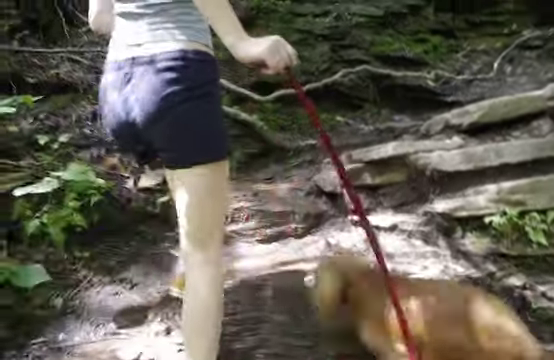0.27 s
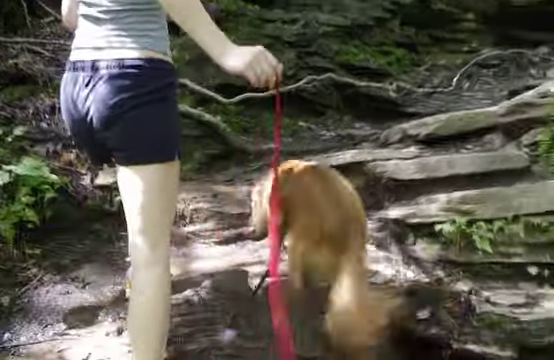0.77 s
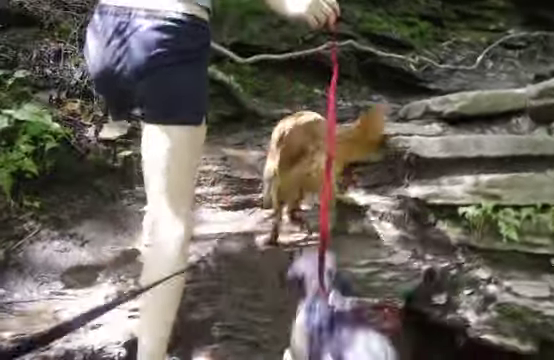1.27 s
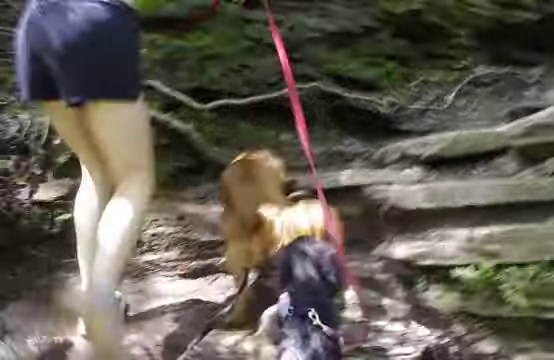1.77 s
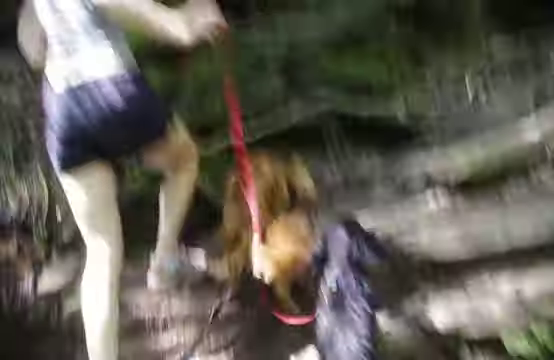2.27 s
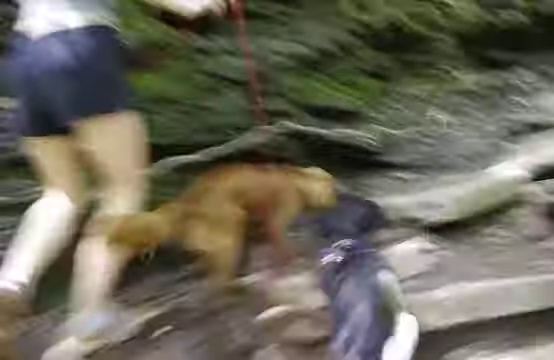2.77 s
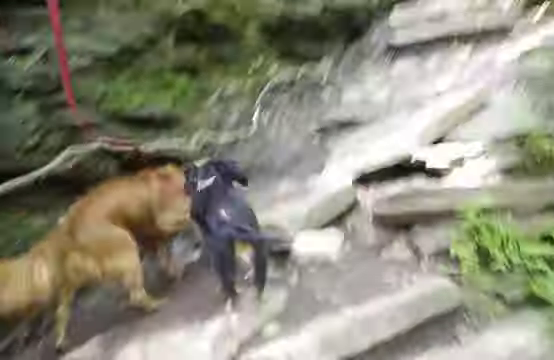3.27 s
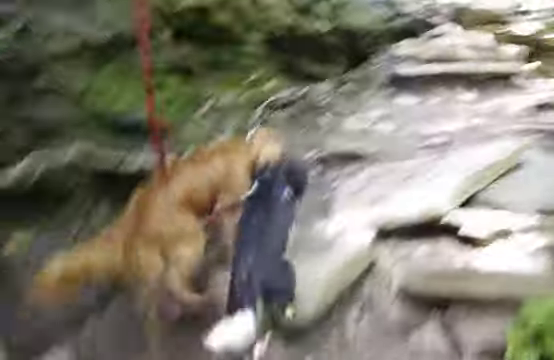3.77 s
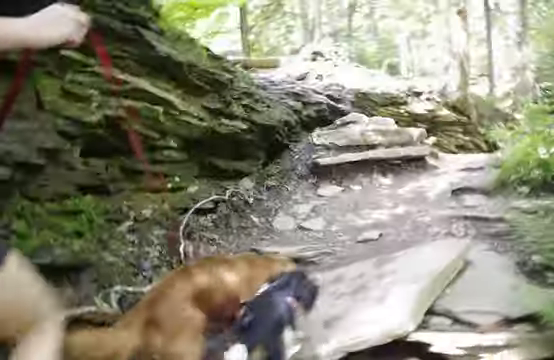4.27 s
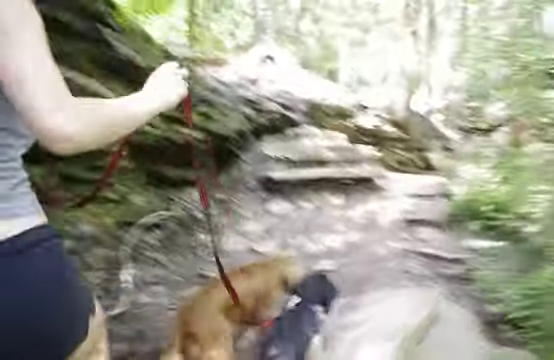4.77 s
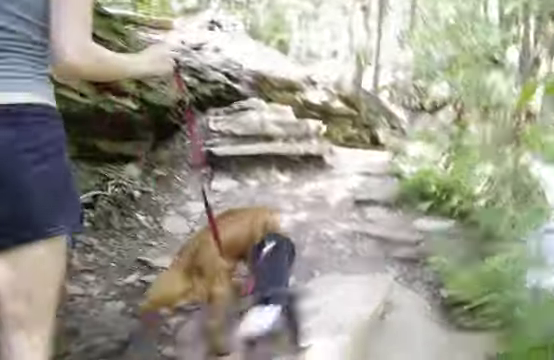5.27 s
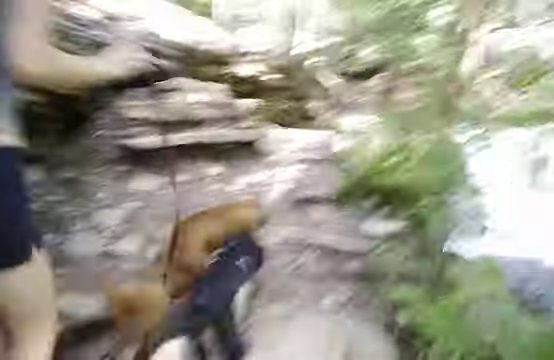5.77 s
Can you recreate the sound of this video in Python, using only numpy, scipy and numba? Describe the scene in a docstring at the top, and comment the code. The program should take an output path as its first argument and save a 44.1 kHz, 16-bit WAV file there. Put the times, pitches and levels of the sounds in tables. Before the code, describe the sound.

Water splashes down rocky ledges in an even hiss that turns a little thinner as the microphone moves along.

```python
"""A small waterfall beside a rocky path, heard by a hand-held mono phone that walks and turns.
From the start, countless drops and bubbles merge into a hiss, and a rock wall close by adds low roar.
At about 3 s the phone turns from the wall; the roar drops and keeps fading as the phone walks on.
All along, narrow bands of pitch swell among the rocks and the hiss spits now and then.
The phone's fast limiter turns the hiss down for a moment after each peak."""
import sys
import numpy as np
from scipy import signal
from scipy.fft import rfft, irfft, next_fast_len
from scipy.io import wavfile
from scipy.ndimage import uniform_filter1d
from numba import njit

SR = 44100
rng = np.random.default_rng(int(sys.argv[2]) if len(sys.argv) > 2 else 0)


def output_pcm(signal):
    """Save a mono or channel-first signal as 16-bit PCM at the path in sys.argv[1].

    Samples are clipped to [-1, 1] before scaling.
    """
    pcm = np.clip(np.atleast_2d(signal).T, -1, 1) * 32767
    wavfile.write(sys.argv[1], SR, np.round(pcm).astype(np.int16))


N = 266018

TURN_MIDDLE_S, TURN_LENGTH_S = 2.95, .5
ROAR_HZ, ROAR_OCTAVES, ROAR_FADE_DB_PER_S = 650, 0.47, 1.5
SWELL_WIDTH_HZ = 170.0
SMALL_SPITS_PER_S, SMALL_SPIT_DB, SPIT_S = 3, 5, 0.00076


def waterfall():
    """Drops of every size merge into a flickering hiss, which loses roar as the phone turns away."""
    # the tone of the water and microphone together: (frequency [Hz], level [dB])
    colour = [(25, -25), (120, -13), (270, -5.5), (600, -3.5), (1000, -7), (1420, -8), (2200, -7.5),
              (3340, -7.5), (4400, -5), (5850, -4), (7500, -0.5), (8900, 2.5), (10000, -3), (12500, -14),
              (15000, -21.5)]
    # what the rock wall adds while the phone faces it: (frequency [Hz], boost [dB])
    wall = [(100, 2), (250, 3.5), (620, 4), (1200, 2.5), (2200, 3.5), (4000, 2), (6500, 0.8), (11500, -0.4)]
    colour_hz, colour_db = np.transpose(colour)
    wall_hz, wall_db = np.transpose(wall)
    size = next_fast_len(N)
    impacts = rng.standard_normal(size) * undb(1.2 * rng.exponential(size=size))
    octave = np.log2(np.maximum(np.arange(size // 2 + 1) * SR / size, 1))
    spectrum = rfft(impacts) * undb(np.interp(octave, np.log2(colour_hz), colour_db))
    since_turn_s = np.arange(N) / SR - TURN_MIDDLE_S
    facing = np.cos(np.pi / 2 * np.clip(since_turn_s / TURN_LENGTH_S + .5, 0, 1)) ** 2  # from 1 to 0
    fade_db = -ROAR_FADE_DB_PER_S * np.maximum(since_turn_s, 0)
    surge_db = 0.47 * wander(11) + 0.46 * wander(4.13)  # the flow surges in all bands at once
    hiss = 0
    for centre in np.arange(4.5, 14.6, .5):  # bands half an octave apart, low to high
        share = np.cos(np.pi * np.clip(octave - centre, -.5, .5)) ** 2
        band = irfft(spectrum * share, size)[:N]
        turn_db = np.interp(centre, np.log2(wall_hz), wall_db) * (facing - .5)
        roar_db = np.exp(-((centre - np.log2(ROAR_HZ)) / ROAR_OCTAVES) ** 2) * fade_db
        flicker_db = 0.44 * wander(9)
        hiss = hiss + band * undb(turn_db + roar_db + surge_db + flicker_db)
    return hiss * undb(-20) / hiss.std()


def spit_gain():
    """A volume curve that makes the hiss spit: each spit is a jump about a millisecond long."""
    # the strongest spits: (time [s], boost [dB])
    strong_spits = [(1.234, 6.5), (1.355, 8.5), (1.872, 10), (3.184, 12), (3.349, 8), (3.43, 9.5),
                    (3.548, 7.5), (4.027, 9), (5.056, 11), (5.397, 7)]
    jumps_db = SMALL_SPIT_DB * (rng.random(N) < SMALL_SPITS_PER_S / SR)  # small ones fall by chance
    for time_s, boost_db in strong_spits:
        jumps_db[int(time_s * SR)] = boost_db
    bump = np.exp(-(np.arange(-64, 65) / SR / SPIT_S) ** 2)
    return undb(np.convolve(jumps_db, bump, "same"))


def rocks(hiss):
    """As the phone moves among the rocks, narrow bands swell and faint echoes drift."""
    # bands that grow louder for a while: (middle time [s], length [s], frequency [Hz], boost [dB])
    swells = [(.42, .7, 4430, 4), (.45, 0.51, 2480, 5), (.8, 2.2, 690, 3.5), (.9, .5, 3970, 3),
              (1.3, 2.7, 257, 2.5), (1.6, 1.1, 3550, 3), (2.05, .6, 4430, 3), (2.252, 1.7, 2190, 2.5),
              (2.65, 0.83, 840, 3.5), (3.6, .8, 1200, 2.5), (4.1, 1, 1370, 3.5), (5.098, 1.4, 1120, 4.5),
              (5.55, .6, 2980, 1.5), (5.6, .9, 1270, 3)]
    t = np.arange(N) / SR
    for middle_s, length_s, hz, boost_db in swells:
        swell = np.sin(np.pi * np.clip((t - middle_s) / length_s + .5, 0, 1)) ** 2
        band = band_pass(hiss, float(hz), SWELL_WIDTH_HZ)
        hiss = hiss + (undb(boost_db) - 1) * swell * band
    delays = [SR * delay_s * (1 + 0.057 * wander(1.5)) for delay_s in (.0021, .0034)]
    return hiss + undb(-29) * sum(echo(hiss, delay) for delay in delays)


@njit
def echo(x, delay):
    """The sound comes back off a ledge or the ground, after a drifting delay counted in samples."""
    y = np.zeros(len(x))
    for i in range(len(x)):
        k = int(i - delay[i])
        if k >= 0:
            y[i] = x[k] + (i - delay[i] - k) * (x[k + 1] - x[k])
    return y


@njit
def limiter(x, ceiling, attack, release):
    """The volume falls quickly when a peak passes the ceiling and creeps back afterwards."""
    y, peak = np.empty(len(x)), ceiling
    for i in range(len(x)):
        y[i] = x[i] * (ceiling / peak)
        target = max(abs(x[i]), ceiling)
        peak += (target - peak) * (attack if target > peak else release)
    return y


@njit
def band_pass(x, hz, width_hz):
    """Keeps only the sound near one frequency, at full strength in the middle."""
    y, band_state, low_state = np.empty(len(x)), 0., 0.
    tuning, damping = np.tan(np.pi * hz / SR), width_hz / hz
    for i in range(len(x)):
        band = (band_state + tuning * (x[i] - low_state)) / (1 + tuning * (tuning + damping))
        band_state = 2 * band - band_state
        low_state += 2 * tuning * band
        y[i] = damping * band
    return y


def wander(per_s):
    """A smooth random curve, roughly 1 in size, that heads for a new value per_s times a second."""
    hold = int(SR / per_s)
    steps = np.repeat(rng.standard_normal(N // hold + 1), hold)
    return 1.66 * uniform_filter1d(uniform_filter1d(steps, hold), hold)[:N]


def undb(db):
    """Turns decibels into a number to multiply the sound by."""
    return 10 ** (np.asarray(db) / 20)


def scene():
    """The spitting waterfall among the rocks, the same on both channels."""
    return np.tile(rocks(waterfall()) * spit_gain(), (2, 1))


def record(dry):
    """The phone's one microphone: peaks are held down, then the bass and highest treble are cut."""
    sound = limiter(dry[0], ceiling=undb(-11.5), attack=0.45, release=0.0013)
    sound = np.tanh(1.514 * sound) / 1.486  # a peak's first swing slips past the limiter and is rounded
    bass_cut = signal.butter(2, 190, "high", fs=SR, output="sos")
    treble_cut = signal.butter(3, 10500, fs=SR, output="sos")
    steep_top_cut = signal.ellip(12, .2, 70, 15040, fs=SR, output="sos")
    for cut in (bass_cut, treble_cut, steep_top_cut):
        sound = signal.sosfilt(cut, sound)
    return np.tile(sound, (2, 1))


dry = scene()
out = record(dry)
output_pcm(out)
```